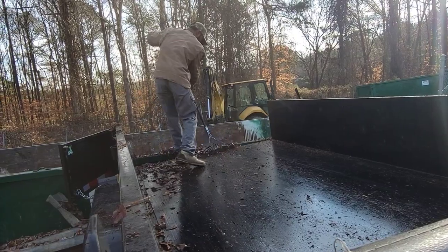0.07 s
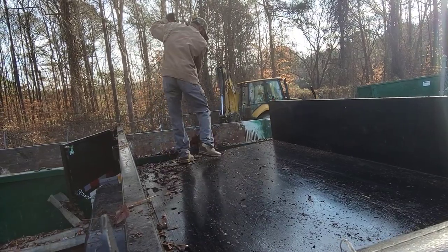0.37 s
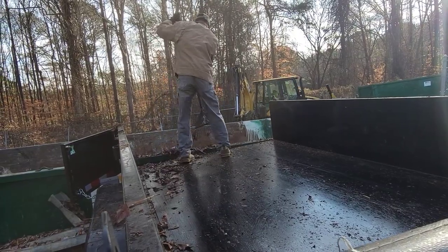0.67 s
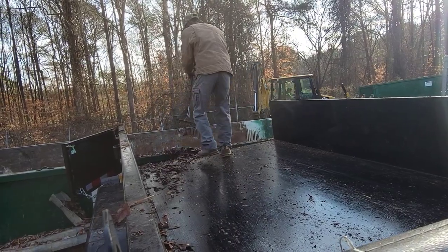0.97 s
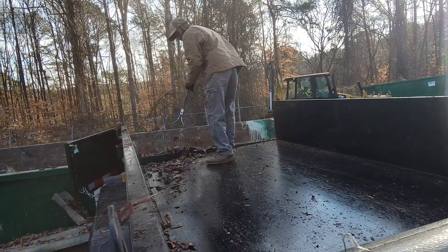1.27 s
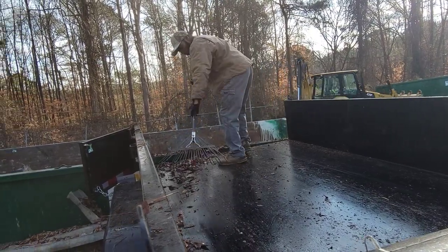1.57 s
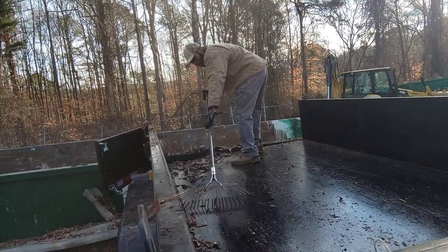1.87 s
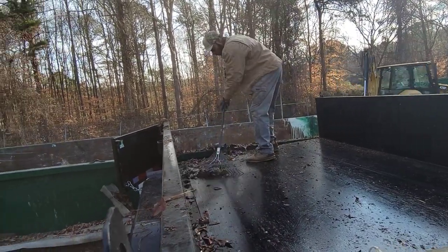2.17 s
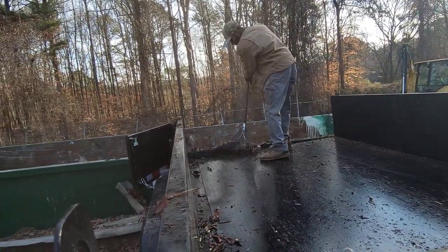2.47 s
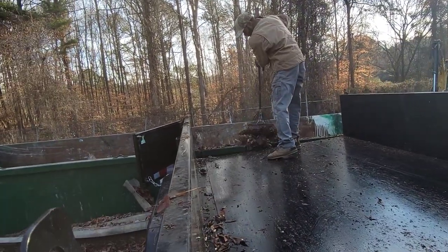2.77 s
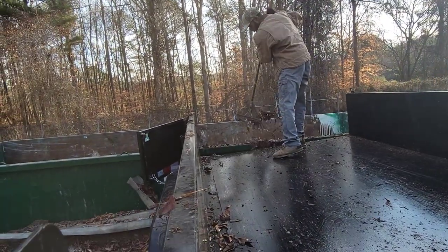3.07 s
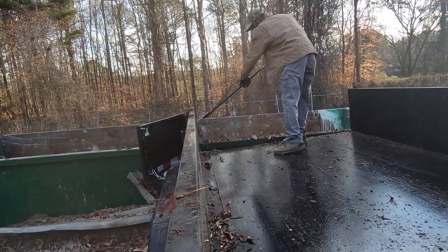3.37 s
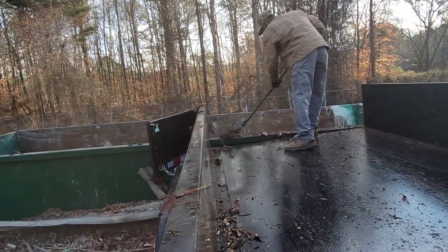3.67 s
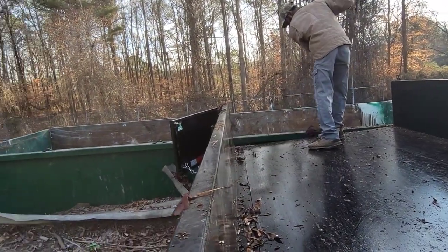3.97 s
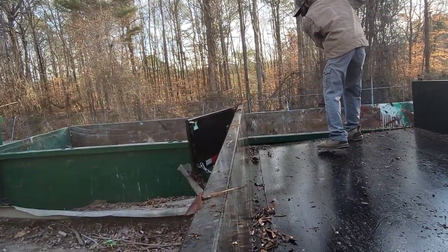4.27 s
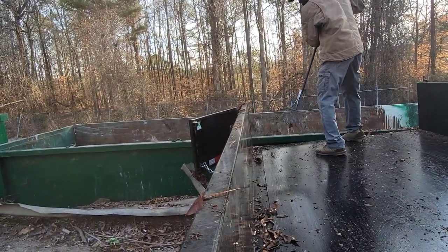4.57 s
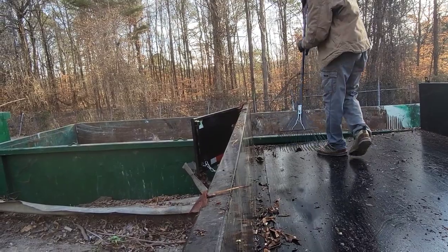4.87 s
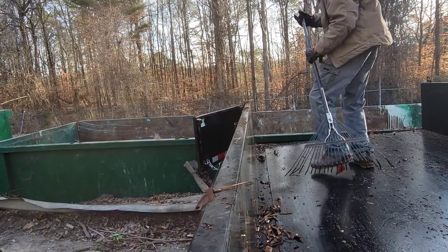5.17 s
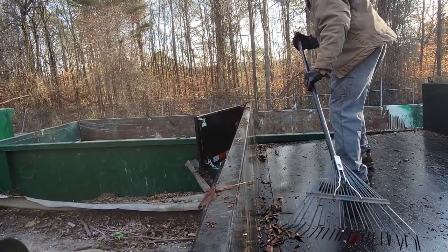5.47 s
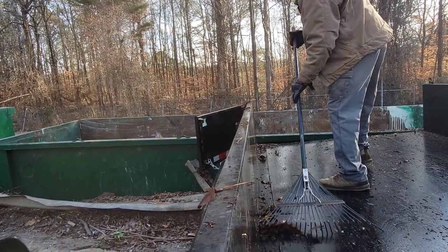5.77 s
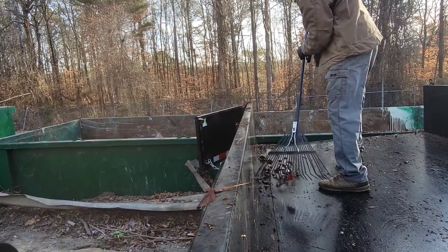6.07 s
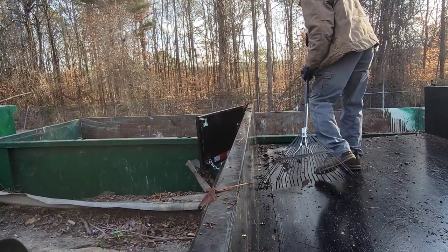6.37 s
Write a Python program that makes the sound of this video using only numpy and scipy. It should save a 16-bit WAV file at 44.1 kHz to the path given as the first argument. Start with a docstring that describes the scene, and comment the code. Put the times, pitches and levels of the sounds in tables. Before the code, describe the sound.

A diesel engine idles with a low, even throb throughout, outdoors, heard from a steel truck bed. A metal leaf rake scrapes briefly across the bed at the start, followed by light tine taps and faint leaf rustle. A short hollow knock comes at 1.1 seconds and a boot thud at 1.4. At 1.8 the rake lands sharply and drags until 2.6, hissing and ringing, with thin squeals near the end and the bed droning beneath. After a few taps, a quick scrape at 3.3 leads into a swelling stroke from 3.5 to 4. A quieter stretch follows, with light taps, a faint engine whine and boot thuds around 4.6 and 5. Another firm scrape pushes leaves from 5.6 to 6, with a brief high squeal. A small scrape at 6.1 and soft taps finish by 6.5 seconds.

```python
"""Outdoors, on the wet steel bed of a truck, a steel leaf rake is dragged in separate strokes.
Its tines (the thin prongs) stick and slip, so they hiss, ring and squeal. The bed drones under them
and leaves are pushed along. Between strokes the tines tap, boots thud and there is one hollow knock.
A diesel engine idles behind it all. A small camera on the bed hears everything through two ports
(microphone holes), the left one brighter."""
import sys
import numpy as np
from scipy import signal
from scipy.fft import rfft, irfft, next_fast_len
from scipy.io import wavfile
from scipy.ndimage import uniform_filter1d

SR = 44100
rng = np.random.default_rng(int(sys.argv[2]) if len(sys.argv) > 2 else 0)


def generate_wav(signal):
    """Clip the signal to [-1, 1] and save it as 16-bit WAV at the path in sys.argv[1]."""
    frames = np.transpose(np.atleast_2d(signal))
    scaled = np.clip(frames, -1, 1) * 32767
    pcm = np.round(scaled).astype(np.int16)
    wavfile.write(sys.argv[1], SR, pcm)


N = 287532
T = np.arange(N) / SR
FFT_SIZE = next_fast_len(N + SR // 10, True)
FREQS = np.maximum(np.arange(FFT_SIZE // 2 + 1) * SR / FFT_SIZE, 1)

# rake strokes: start/s, end/s, attack/s, fade as the rake lifts/(dB/s), drag level/dB,
# then, added to the drag level: bed drone/dB, leaf rustle/dB, tine chatter/dB
RAKE_STROKES = [(0.0, 0.205, 0.015, 240, -26.5, -3.5, -5, -1.5),
                (1.836, 2.626, 0.01, 90, -31.5, -0.5, -6, 4),
                (3.341, 3.398, 0.006, 320, -24.5, -6.5, -5.5, -1),
                (3.53, 3.985, 0.19, 145, -31, -4.5, -3, -11.5), (5.615, 5.97, 0.02, 242, -26, -1, -6, -2.5),
                (6.112, 6.175, 0.011, 170, -37.5, 0.5, -7.5, 5)]
# tugs on the handle: t/s, half length/s, extra push on the tines/dB, extra bed drone/dB
HANDLE_TUGS = [(0.155, .06, 4, 1.5), (1.862, .035, 9, 9.5), (2.135, .03, 3, 0), (2.265, .05, 4.5, 0),
               (2.525, .06, 9.5, 5.5), (3.68, .025, 3, 0), (3.8, .03, 5, 6), (3.925, .04, 4, 0),
               (5.68, .035, 6, 3), (5.78, .035, 4, 1), (5.945, .035, 8, 1)]
# tines striking the bed: t/s, strength/dB, bright tick compared with that strength/dB
TINE_TAPS = [(0.372, -17.5, -17), (0.4918, -31, -15), (0.686, -34, -25), (0.7333, -33, -23),
             (1.055, -37.5, -19), (1.3233, -31.5, -23), (1.368, -14.5, -15.5), (1.669, -28, -20),
             (1.786, -25, -14), (1.8357, -7.5, -16.5), (1.854, -9, -13), (2.8013, -20.5, -17),
             (2.9336, -27, -28), (3.091, -25.5, -15), (3.27, -30, -31), (3.3484, -11, -21),
             (3.388, -13, -30), (3.495, -26, -18), (3.7855, -15, -18), (4.2864, -19.5, -17),
             (4.379, -28, -15), (4.574, -27, -19), (4.9783, -33.5, -26), (5.5248, -35, -14),
             (5.631, -11, -24), (5.6787, -8, -19), (6.1205, -27, -19), (6.267, -29, -17), (6.313, -33, -19),
             (6.485, -33, -19)]
# loose leaf litter shifting between strokes: start/s, end/s, start level/dB, end level/dB
LITTER_SHIFTS = [(0.36, 1.08, -42.5, -52.5), (1.685, 1.825, -43.5, -35), (2.68, 3.04, -39, -49),
                 (3.11, 3.32, -46, -47), (4.22, 4.95, -47.5, -52.5), (5.324, 5.625, -51, -42),
                 (6.177, 6.425, -42, -52)]
# single tines that catch and squeal: t/s, length/s, f/Hz, wobble/Hz, level/dB
TINE_SQUEALS = [(1.717, .02, 5560, 260, -39), (1.802, .046, 1585, 60, -38), (2.46, 0.073, 3780, 90, -26.5),
                (2.5, .09, 4970, 70, -26.5), (2.547, .058, 2210, 55, -31.5), (2.555, .099, 1060, 45, -33),
                (3.356, .016, 3590, 130, -27), (3.366, .026, 1298, 110, -29.5),
                (3.67, .04, 12600, 1100, -31), (3.687, .017, 5450, 100, -33), (3.688, .042, 3470, 200, -33),
                (3.742, .022, 5400, 110, -35), (3.764, .027, 1668, 60, -35), (3.988, .043, 1750, 55, -39.5),
                (5.782, .026, 4960, 360, -23), (6.14, .064, 5410, 300, -38)]
# the notes at which the tines and the steel bed ring: f/Hz, width/Hz, level/dB
TINE_NOTES = [(2137, 49, -16), (3137, 130, 2), (3234, 74, -1.5), (3490, 61, 2.5), (3680, 210, -0.5),
              (3790, 34, -4), (4120, 89, 0.5), (4460, 97, -3), (4644, 120, -0.5), (4910, 39, -7),
              (5500, 67, -8), (5780, 58, 1), (6020, 120, -7), (7040, 180, -2)]
BED_NOTES = [(283, 24, -5.5), (355.4, 37, -4), (459, 67, -2.5), (560, 44, 0), (654, 36, -2.5),
             (873, 82, -2.5), (1033, 45, -5), (1227, 69, -3), (1348, 63, 0.5), (1654, 120, -5.5)]
# tone colours of the three parts of a scrape: f/Hz, level/dB
HISS_COLOUR = [(1200, -19.5), (2000, -7), (2450, -7.5), (3000, -0.5), (4200, -2), (5500, 0.5), (6300, -2.5),
               (7500, -13), (8300, -30.5), (10000, -40)]
BED_COLOUR = [(110, -33), (200, -3), (330, -1.5), (500, 0), (700, 0), (1050, 4.5), (1400, -0.5),
              (1900, -4.5), (2800, -1.5), (5000, -27.5)]
LEAF_COLOUR = [(5000, 1), (7500, -3.5), (8400, -15.5), (9500, -3.5), (11000, -2), (12700, 1), (14500, -1),
               (16000, -8)]
# boots on the bed: t/s, thud level/dB, clunk level/dB, decay/s
BOOT_STEPS = [(1.383, -27, -31, 0.16), (3.79, -52, -27, 0.16), (4.6, -45, -35, 0.082),
              (4.984, -30.5, -32, 0.12), (5.033, -24.5, -45, 0.15)]
# how often the idling engine fires: t/s, f/Hz
FIRING_RATE = [(0.0, 28.38), (0.7, 28.41), (1.4, 28.19), (2.0, 27.86), (2.6, 28.39), (3.4, 28.19),
               (4.4, 28.25), (4.9, 27.75), (5.6, 28.37), (6.1, 28.29), (6.52, 29.55)]
# tone colour of the noise from the engine block and the open air: f/Hz, level/dB
BLOCK_COLOUR = [(90, -20), (160, -3), (320, -1), (500, -9.5), (800, -18.5), (1250, -24.5), (2000, -28),
                (3200, -30), (5000, -35), (6300, -41), (8200, -54), (12500, -55), (16000, -60)]
# how loud that noise is over time: t/s, level/dB
BLOCK_LOUDNESS = [(0, -38), (1.2, -36), (1.6, -37), (3, -40), (6.52, -40.5)]
# faint whines of the engine: start/s, end/s, f/Hz, level/dB
ENGINE_WHINES = [(0.296, 1.1, 579, -49.5), (4.406, 5.653, 477.8, -46.5)]
# how much louder the left port is than the right: f/Hz, level/dB
LEFT_OVER_RIGHT = [(150, -2.1), (300, -.5), (560, 3.5), (950, .5), (1500, 3.5), (2500, -.5), (4000, -2.7),
                   (5600, -1.3), (6800, 5), (8100, 12), (9000, 9.5), (11500, 9), (13000, 6.5), (16000, 6.5)]

BED_LAG_S, BED_FADE_DB_PER_S = .03, 92  # the bed answers late and rings on
TINE_TUG_SHARE, LEAF_TUG_SHARE = .98, .65  # how much of each tug they feel
CHATTER_GROWTH = 1.45  # dB of chatter per dB of pressure
TAP_SPREAD_S, TAP_SPREAD_S_PER_DB = .0075, .0003  # the tines take longer to land in softer taps
TAP_BED_DB, TAP_BED_GROWTH = -25, 0.64  # bed sound under a 0 dB tap; its dB per dB of tap
PORT_LAG_S, BASS_LEAD_RAD = .00027, 0.37


def rake():
    """Many tines stick and slip at once; they ring, shake the bed and sweep the leaves."""
    hiss, drone, rustle, chatter = stroke_gains()
    litter = litter_gain() * undb(-3.5 + 2.0 * wander(40)) * slips(1300, 2.4)
    tap, tap_bed, tap_tick = tap_forces()
    grip = undb(wander(70))  # the fan of tines catches and lets go as a whole
    slide = hiss * grip
    on_tines = undb(-1.35) * slide * slips(7000, 2.7) + undb(-7) * (litter + tap)
    out = through(on_tines, unit_power(colour(HISS_COLOUR), (2600, 4300)))
    out += ring(undb(-15) * slide, TINE_NOTES) + ring(undb(-15) * drone, BED_NOTES)
    # the main bending note of the tines comes and goes as they bite
    bite = undb(-5) * chatter * slips(4000, 4.1) * undb(1.73 * wander(55))
    bending = unit_power(resonance(4880, 810) ** 2, (4600, 5200))
    out += through(bite + undb(-11.5) * tap + undb(-17) * litter, bending)
    on_bed = undb(-3.5) * drone * grip * slips(5000, 3.7) + tap_bed + undb(-3.5) * litter
    out += through(on_bed, unit_power(colour(BED_COLOUR), (400, 1500)))
    sweep = rustle * grip * undb(0.75 * wander(90)) * slips(7000, 3.6)
    on_leaves = sweep + tap_tick + undb(-18) * litter
    return out + through(on_leaves, unit_power(colour(LEAF_COLOUR), (9000, 15000)))


def stroke_gains():
    """The pressure of each stroke drives tine hiss, bed drone, leaf rustle and tine chatter."""
    hiss = drone = rustle = chatter = 0
    tine_column, bed_column = 2, 3  # in HANDLE_TUGS
    for stroke in RAKE_STROKES:
        lift, drag_db, bed_db, leaf_db, chatter_db = stroke[3:]
        tine_load = pressure(stroke, tine_column, TINE_TUG_SHARE, 0, lift)
        bed_load = pressure(stroke, bed_column, 1, BED_LAG_S, BED_FADE_DB_PER_S)
        leaf_load = pressure(stroke, tine_column, LEAF_TUG_SHARE, 0, lift)
        hiss += undb(drag_db) * tine_load
        chatter += undb(drag_db + chatter_db) * tine_load ** CHATTER_GROWTH
        drone += undb(drag_db + bed_db) * bed_load
        rustle += undb(drag_db + leaf_db) * leaf_load
    return hiss, drone, rustle, chatter


def pressure(stroke, column, tug_share, lag_s, fade_db_per_s):
    """In one stroke the tines bite, drag, press harder at each tug and let go."""
    start, end, attack = stroke[:3]
    bite = np.clip((T - start) / attack, 0, 1)
    late = T - lag_s
    tugs_db = sum(tug[column] * np.exp(-np.minimum(((late - tug[0]) / (tug[1] + lag_s)) ** 2, 20))
                  for tug in HANDLE_TUGS if start < tug[0] < end)
    return bite * undb(tug_share * tugs_db - fade_db_per_s * np.maximum(late - end, 0))


def slips(per_second, scatter_db):
    """Tiny slips over grit make random clicks of uneven size, heard at both ports."""
    clicks = np.zeros((3, N))
    hit = rng.random((3, N)) < per_second / SR
    size_db = scatter_db * np.clip(rng.standard_normal((3, N))[hit], -2.5, 2.5)
    sign = 2 * rng.integers(0, 2, (3, N))[hit] - 1
    clicks[hit] = sign * undb(size_db)
    clicks /= np.std(clicks)
    return at_ports(clicks[0], clicks[1:], direct_db=-6)


def ring(force, notes):
    """Each note of the steel swells and fades as different tines take the load and move along."""
    drive, out = force * slips(6000, 2.9), 0
    for hz, width, db in notes:
        peak = np.concatenate(signal.iirpeak(hz, hz / width, fs=SR))
        gain = np.sqrt(2 * SR / (np.pi * width))  # makes narrow and wide notes equally strong
        out += gain * signal.sosfilt([peak, peak], drive * undb(db + 2.3 * wander(16)))
    return out


def tap_forces():
    """Tines land one after another: a flurry of clicks into tines, bed and grit, then a soft rattle."""
    force = np.zeros((3, N))
    for t, db, tick_db in TINE_TAPS:
        landing = burst(t, 0.001, TAP_SPREAD_S - TAP_SPREAD_S_PER_DB * db)
        flurry = landing + undb(-22) * burst(t, 0.0073, .032)
        force += np.outer(undb([db - 4, TAP_BED_DB + TAP_BED_GROWTH * db, db + tick_db]), flurry)
    return force[:, None] * np.array([slips(2500, 4.3), slips(5000, 1.0), slips(2000, 2.6)])


def litter_gain(fade_s=.028):
    """Litter settles after a stroke, or stirs more and more as the rake comes down."""
    out = 0
    for start, end, start_db, end_db in LITTER_SHIFTS:
        outside_s = np.maximum(start - T, 0) + np.maximum(T - end, 0)
        fade = np.exp(-np.minimum(outside_s / fade_s, 50))
        out += undb(np.interp(T, [start, end], [start_db, end_db])) * fade
    return out


def squeals():
    """A caught tine chatters briefly on one rough, wobbling note."""
    out = np.zeros((2, N))
    for t, length, hz, wobble_hz, db in TINE_SQUEALS:
        part = slice(int((t - 2 * length) * SR), int((t + 2 * length) * SR))
        hold = int(SR / wobble_hz / 2)
        jitter = uniform_filter1d(rng.standard_normal((2, len(T[part]))), hold) * np.sqrt(hold)
        note = np.sin(2 * np.pi * np.cumsum(hz + wobble_hz * jitter, axis=1) / SR)
        swell = np.exp(-2 * ((T[part] - t) / length) ** 2)
        out[:, part] += 2 * undb(db) * swell * note
    return out


def boots():
    """Heavy steps bend the bed with a thud and make its frame clunk."""
    thud = sum(undb(db) * burst(t, 0.0022, decay) for t, db, _, decay in BOOT_STEPS)
    clunk = sum(undb(db) * burst(t, 0.0073, decay) for t, _, db, decay in BOOT_STEPS)
    bed = through(thud * noise(), unit_power(resonance(81, 52) ** 2, (20, 300)))
    frame = through(clunk * slips(4000, 2.2), unit_power(resonance(287, 530) ** 2, (100, 1500)))
    return bed + frame


def knock(start_s=1.1405, hz=680):
    """A short hollow knock and its echo from the side wall."""
    return sum(undb(db) * burst(t, .0002, .004) * np.sin(2 * np.pi * hz * (T - t))
               for t, db in [(start_s, -22), (start_s + .011, -28)])


def diesel():
    """Each firing sends a puff through the silencer; the panels clatter in step and the block hisses."""
    cycles = np.cumsum(np.interp(T, *np.transpose(FIRING_RATE))) / SR + .17
    firing, phase = cycles.astype(int), cycles % 1 - .5
    strength = undb(1.2 * rng.standard_normal(firing[-1] + 1))[firing]
    swing = np.cos(3 * 2 * np.pi * phase - .4)  # the pipe swings three times per firing
    puff = strength * np.exp(-.5 * (phase / 0.16) ** 2) * swing
    crack = strength * np.exp(-.5 * ((phase - .03) / 0.025) ** 2)
    exhaust = undb(-20) * puff + undb(-32.5) * through(crack, resonance(390, 270))
    throb = 1 + 0.092 * np.cos(2 * np.pi * phase)
    panels = resonance(307.7, 25) + undb(-2) * resonance(486, 4.5) + undb(-21) * resonance(127, 22)
    clatter = undb(-45) * through(noise() * throb, unit_power(panels, (20, 2000)))
    deep = colour([(15, -15), (30, 2), (50, 12.5), (110, 12.5), (170, 10), (400, -68), (2000, -86)])
    rumble = undb(-37) * through(noise(), unit_power(deep, (20, 300)))
    air = at_ports(noise() * throb, np.array([noise(), noise()]), direct_db=-11.5)
    block_db = np.interp(T, *np.transpose(BLOCK_LOUDNESS)) + 0.66 * wander(4.6)
    block = undb(block_db) * through(air, unit_power(colour(BLOCK_COLOUR), (160, 15000)))
    # only the low sounds get past the truck's body
    body = colour([(25, -2.5), (45, 0.5), (600, 1), (1500, -18), (4000, -41)])
    return through(exhaust + clatter, body) + rumble + block


def whine():
    """The engine's thin, unsteady tone fades in and out over the idle."""
    out = 0
    for start, end, hz, db in ENGINE_WHINES:
        fade = np.clip(np.minimum(T - start, end - T) / 0.15, 0, 1)
        gain = undb(db + 2 * wander(9)) * fade
        out += gain * np.sin(2 * np.pi * np.cumsum(hz + 3 * wander(20)) / SR)
    return out


def at_ports(shared, own, direct_db):
    """Sound reaches the right port first; above the bass, the walls scatter it differently to each."""
    direct = np.array([np.roll(shared, int(PORT_LAG_S * SR)), shared])
    low, high = (signal.butter(2, 340, kind, fs=SR, output="sos") for kind in ("lowpass", "highpass"))
    scattered = (undb(direct_db) * direct + own) / np.hypot(undb(direct_db), 1)
    return signal.sosfilt(low, direct) - signal.sosfilt(high, scattered)


def burst(start, rise, decay):
    """The loudness of a blow: it rises fast, then dies away."""
    out, part = np.zeros(N), slice(int(start * SR), int((start + 10 * decay) * SR))
    age = np.maximum(T[part] - start, 0)
    out[part] = (1 - np.exp(-age / rise)) * np.exp(-age / decay)
    return out


def wander(per_second):
    """A smooth random drift around zero."""
    hold = int(SR / per_second)
    return 1.7 * uniform_filter1d(np.repeat(rng.standard_normal(N // hold + 1), hold), hold)[:N]


def noise():
    """White noise, an even hiss."""
    return rng.standard_normal(N)


def undb(db):
    """Turn decibels into a gain."""
    return 10 ** (np.asarray(db) / 20)


def through(x, response):
    """Pass a sound through a filter."""
    return irfft(rfft(x, FFT_SIZE) * response, FFT_SIZE)[..., :N]


def colour(points):
    """A filter drawn through points of f/Hz, level/dB."""
    hz, db = np.transpose(points)
    return undb(np.interp(np.log(FREQS), np.log(hz), db))


def resonance(hz, width_hz):
    """A filter that rings at one note, with gain 1 there."""
    return 1 / (1 + 1j * (FREQS ** 2 - hz ** 2) / (FREQS * width_hz))


def unit_power(response, band_hz):
    """Scale a filter so that white noise comes out with power 1 inside a band."""
    inside = (FREQS > band_hz[0]) & (FREQS < band_hz[1])
    return response / np.sqrt(np.mean(np.abs(response) ** 2 * inside))


def scene():
    """All the sources together, coloured by the two ports."""
    sound = rake() + squeals() + boots() + knock() + diesel() + whine()
    # the left port leads in the bass; each port takes half of the lead and of the level gap
    lead = np.exp(.5j * BASS_LEAD_RAD / (1 + (FREQS / 450) ** 2))
    left = lead * colour([(hz, db / 2) for hz, db in LEFT_OVER_RIGHT])
    return through(sound, np.array([left, 1 / left]))


def record(dry):
    """The camera flattens peaks at full scale and cuts the highest treble."""
    treble_cut = signal.ellip(10, .2, 80, 15800, fs=SR, output="sos")
    return signal.sosfilt(treble_cut, np.clip(dry, -1, 1))


dry = scene()
out = record(dry)
generate_wav(out)
```